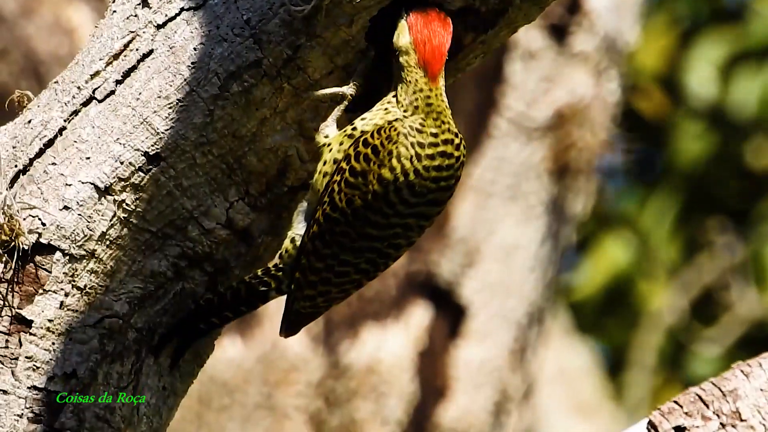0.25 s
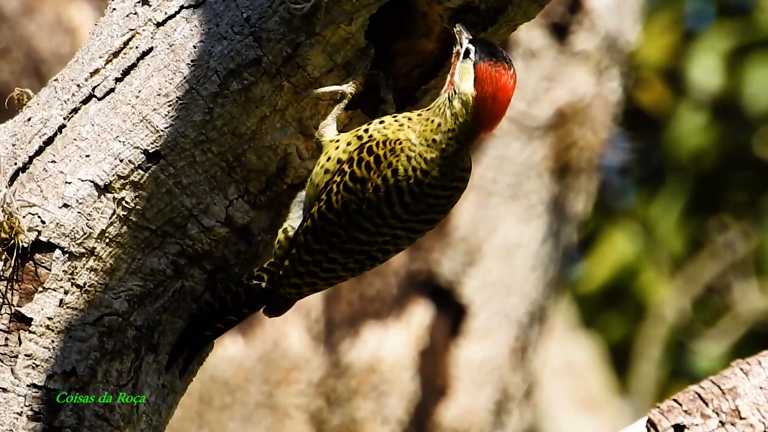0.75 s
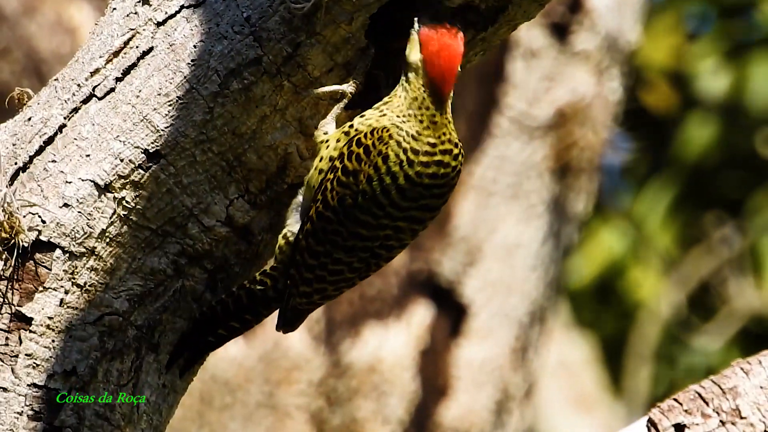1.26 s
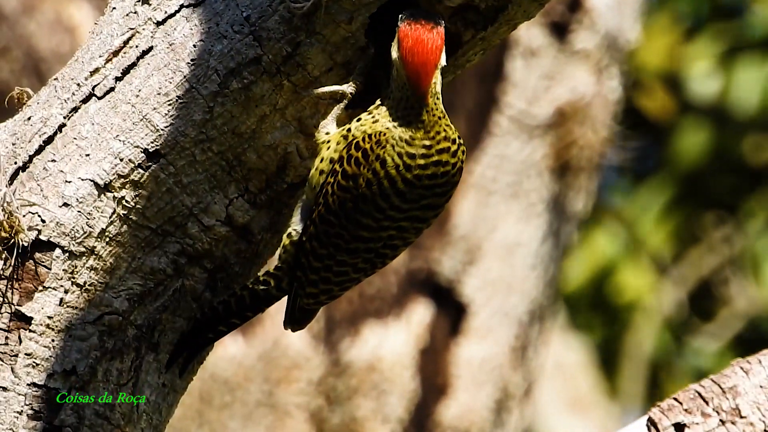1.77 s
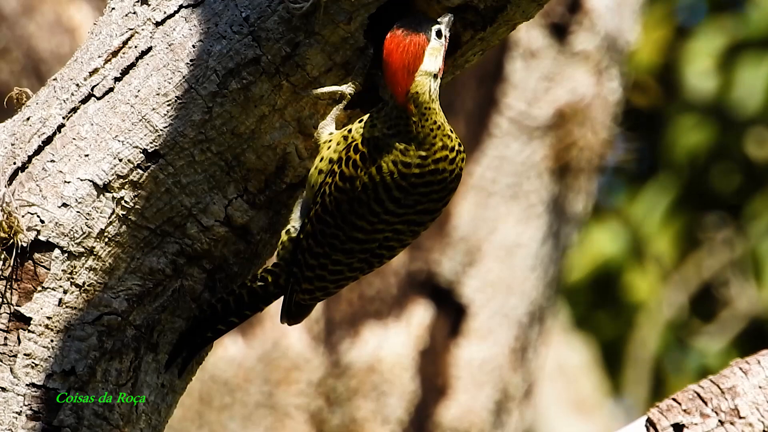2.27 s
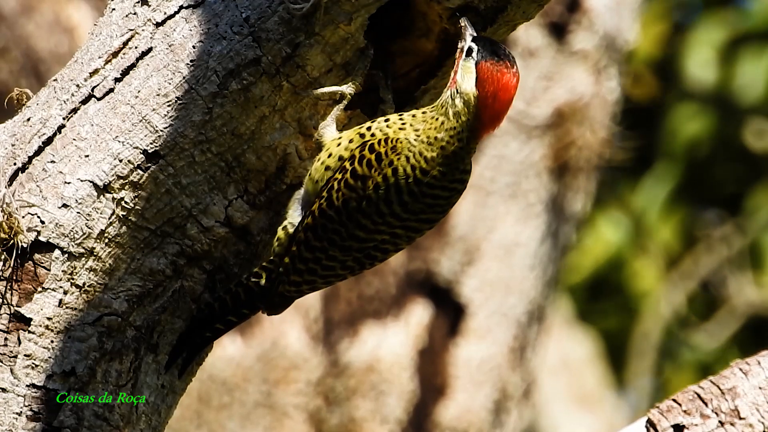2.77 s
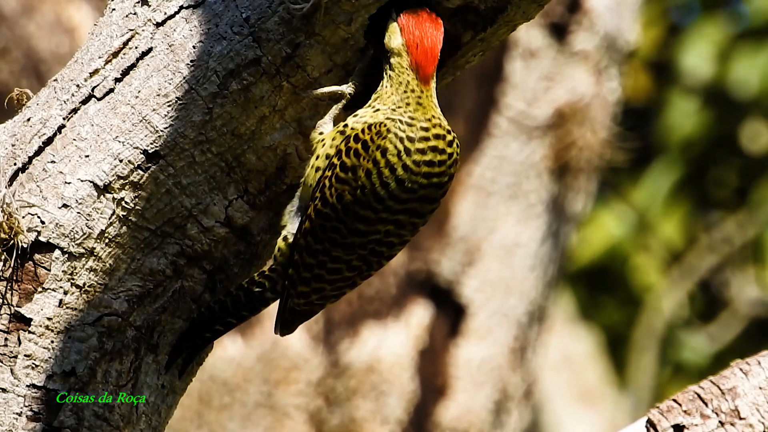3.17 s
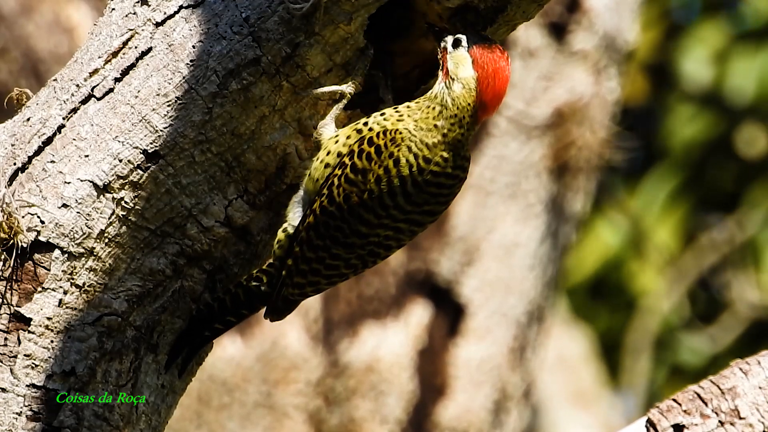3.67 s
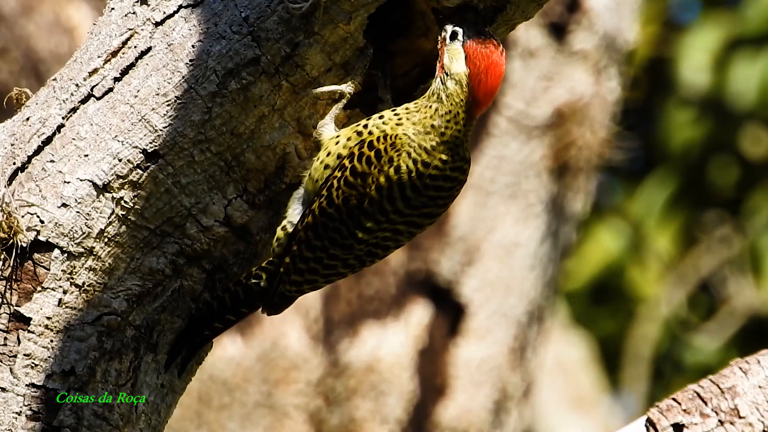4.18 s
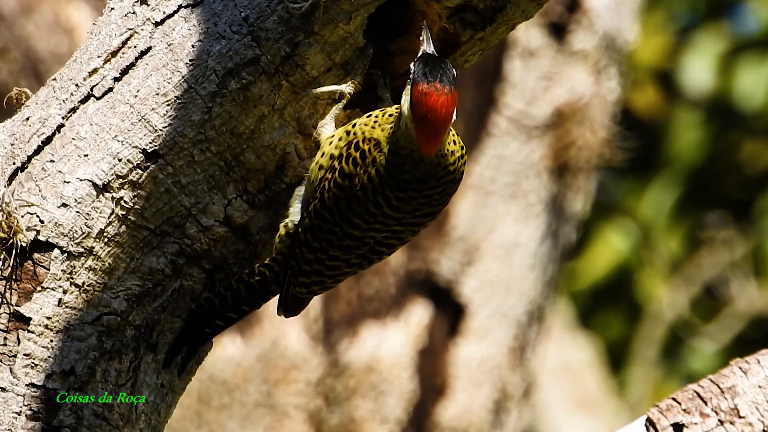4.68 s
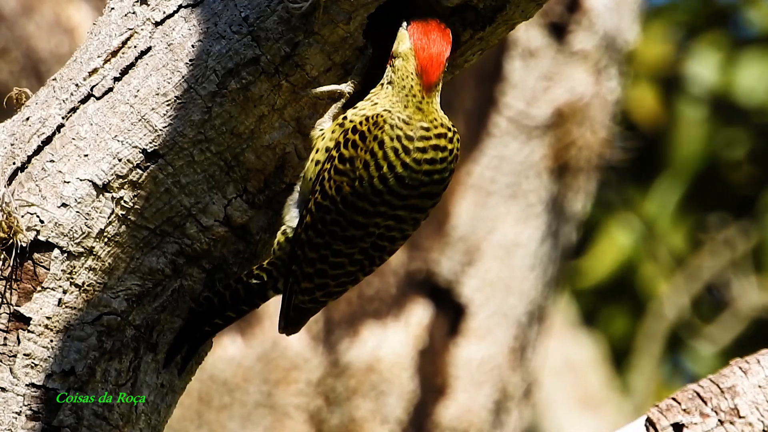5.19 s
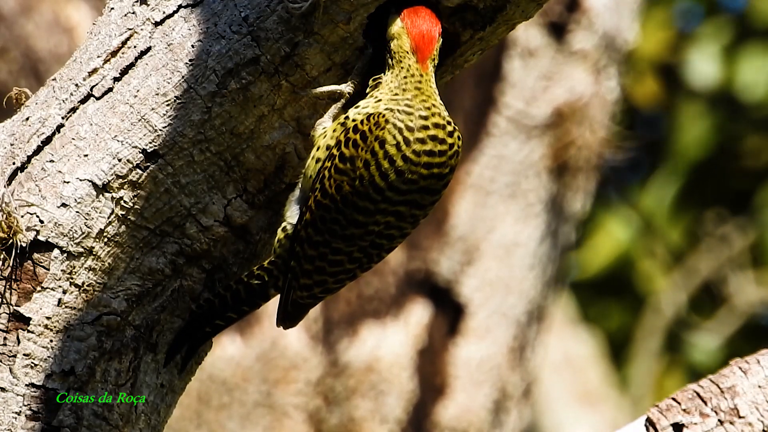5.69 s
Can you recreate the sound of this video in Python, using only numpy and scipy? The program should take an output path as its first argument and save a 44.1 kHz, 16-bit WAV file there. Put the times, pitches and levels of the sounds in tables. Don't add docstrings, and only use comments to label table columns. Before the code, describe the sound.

A woodpecker gives seven short, clear arched calls with woodland echo over soft insect hiss, while a more distant bird squeaks and finally whistles downward.

```python
import sys
import numpy as np
from scipy import signal
from scipy.fft import rfft, irfft, next_fast_len
from scipy.io import wavfile
from scipy.ndimage import uniform_filter1d

SR = 44100
rng = np.random.default_rng(int(sys.argv[2]) if len(sys.argv) > 2 else 0)


def linear_from_db(decibels):
    return 10 ** (np.asarray(decibels, float) / 20)


def int16_out(signal):
    q = np.round(np.clip(np.atleast_2d(signal).T, -1, 1) * 32767)
    wavfile.write(sys.argv[1], SR, q.astype(np.int16))


N = 261954
LEAD_S = 0.4
TIME = np.arange(N + int(LEAD_S * SR)) / SR - LEAD_S


def band(x, hz, width):
    return signal.lfilter(*signal.iirpeak(hz, hz / width, fs=SR), x)


def walk(rate, size):
    k = int(SR / rate)
    held = np.repeat(rng.standard_normal(size // k + 1), k)
    return 1.3 * uniform_filter1d(uniform_filter1d(held, k), k)[:size]


def on_log(hz, table):
    table_hz, values = np.transpose(table)
    return np.interp(np.log(hz), np.log(table_hz), values)


def woodpecker():
    # start_s, drop_end_s, held_pitch_hz, drift_hz_per_s, swell_of_overtones_4_and_5_db_per_s
    series = [
        (0.296, 0.516, 1458, 641, 59),
        (0.8717, 1.072, 1480, -310, 85),
        (1.4447, 1.662, 1456, 261, 18),
        (2.0193, 2.206, 1482, 378, 15),
        (2.6938, 2.8966, 1448, 230, 106),
        (3.3187, 3.5134, 1405, 746, -21),
        (3.9332, 4.1363, 1484, 198.5, 59),
    ]
    # overtone_1_db, overtone_2_db, overtone_4_db, overtone_5_db, overtone_2_below_null_db
    overtone_levels = [(-39, -36.5, -41.5, -35.5, -2), (-34, -37, -40.5, -20, 1.5),
                       (-38, -32.5, -34.5, -28.5, -5.5), (-35.5, -28, -45.5, -37.5, -8),
                       (-35, -36, -41, -26, -0.5), (-36, -37.5, -45, -37, -1.5),
                       (-35, -28.5, -35.5, -34.5, -6)]
    # overtone_3_db, overtone_6_db, overtone_7_db, overtone_8_db, overtone_9_db
    beak_colours = [(-23, -25, -35, -61, -51), (-17, -6, -15, -29, -49), (-9, -12.5, -19, -53, -41),
                    (-15, -14, -16.5, -36, -34), (-18.5, -3.5, -10, -31, -39), (-18, -26, -36, -59, -55),
                    (-10.5, -23, -27, -38, -40)]
    # fundamental_db, overtones_2_3_db, higher_overtones_db
    head_aim = [(-0.5, 1, -3), (-5, 4, -4.5), (-2, -0.5, -3.5), (-4.5, 1.5, 9), (-3.5, 3.5, -4),
                (-5.5, 6.5, 4.5), (1, -1.5, 5)]
    voices = list(zip(series, overtone_levels, beak_colours))
    calls = [call(*voice, hoarse=(k == 0)) for k, voice in enumerate(voices)]
    earlier = linear_from_db(3.5) * call(*voices[2], hoarse=False, shift_s=-1.719)
    away = np.zeros(len(TIME))
    for edges_hz, aim_db in zip(((900, 1900), (1900, 5000), (5000, 8000)), np.transpose(head_aim)):
        sos = signal.butter(4, edges_hz, "band", fs=SR, output="sos")
        away += signal.sosfilt(sos, linear_from_db(aim_db) @ calls + earlier)
    return sum(calls), away


def call(row, levels, beak, hoarse, shift_s=0.0):
    # time_s, half_tones_db, rasp_db, pitch_jitter_rad
    hoarseness = [
        (.29, -70, -52, .7),
        (.325, -52, -38, .45),
        (.398, -42, -37, .25),
        (.412, -39, -48, .07),
        (.455, -41.5, -49, .075),
        (.467, -67, -64, .021),
        (.521, -71, -66, .021),
    ]
    # multiple_of_pitch, level_db
    half_tones = [(1.5, 4), (2.5, -2.5), (3.5, -3.5), (4.5, 10), (5.5, -32)]
    # centre_hz, width_hz, level_db
    rasp_bands = [(1720, 480, -2.5), (2320, 240, 7), (2750, 810, 1.5), (4400, 270, 0), (5200, 310, -2),
                  (5900, 350, -1), (6600, 350, -5), (7400, 440, 2)]
    start, end = row[:2]
    span = slice(*np.searchsorted(TIME, [start + shift_s, end + 0.008 + shift_s]))
    t = TIME[span] - shift_s
    size = len(t)
    hz, db1, db2, db4, db5 = arch(row, levels, t)
    times, *curves = np.transpose(hoarseness)
    half_db, rasp_db, jitter = (np.interp(t, times, curve) for curve in curves)
    rough = hoarse * jitter
    fall = uniform_filter1d(np.clip(-np.gradient(hz) * SR / 25000, 0, 1), 100)
    phase = 2 * np.pi * np.cumsum(hz) / SR + (rough + 0.012 + 0.22 * fall) * walk(900, size)

    effort_db = 10 * np.log10(linear_from_db(2 * db1) + linear_from_db(2 * db2) + linear_from_db(2 * db5))
    effort_db = effort_db - effort_db.max()
    top_db = db1.max() + 0.49 * effort_db
    tones = [(1, db1), (2, db2), (3, top_db + beak[0] + 12 * fall), (4, db4), (5, db5)]
    tones += [(6 + k, top_db + db + 0.13 * k * effort_db) for k, db in enumerate(beak[1:])]
    if hoarse:
        tones += [(k, half_db + db) for k, db in half_tones]

    sound = np.zeros(size)
    for k, db in tones:
        tremble_db = (0.5 + 4 * rough) * walk(120, size) - 6.9 * rough
        sound += linear_from_db(db + tremble_db) * np.sqrt(2) * np.sin(k * phase + k * k)
    if hoarse:
        noise = rng.standard_normal(size) * linear_from_db(4 * walk(400, size))
        rasp = np.zeros(size)
        for centre_hz, width_hz, db in rasp_bands:
            throat = band(band(noise, centre_hz, width_hz), centre_hz, width_hz)
            rasp += linear_from_db(db + 3.5 * walk(62, size)) * throat
        sound += linear_from_db(rasp_db) * rasp / rasp.std()
    out = np.zeros(len(TIME))
    out[span] = sound * signal.windows.tukey(size, 0.06)
    return out


def arch(row, levels, t):
    # after_start_s, below_held_pitch_hz
    climb = [(0, 591), (.012, 352.5), (.022, 222), (.05, 81.5), (.08, 3.5), (.12, -5.5)]
    # after_end_s, below_held_pitch_hz
    fall_off = [(-.045, -1), (-.024, 16), (-.015, 76.5), (-.008, 233.5), (0, 500), (.006, 541.5)]
    # pitch_hz, then gain of overtones 1, 2, 4, 5 in dB
    slack = [(890, -40, -14, -28, -39), (1062, -21.5, -4.5, -22, -31.5), (1260, -20.5, -11, -16, -15),
             (1389, -5.5, -4, -7, -3), (1498.4, 1.5, -0.5, -2.5, -1.5)]
    # time_s, overtone, gain_db, half_width_s
    crossings = [(.432, 2, -18, .02), (.428, 4, -16, .022), (.49, 2, -10, .006), (.942, 2, -20, .008),
                 (1.02, 2, -18, .02), (.935, 5, -5, .008), (1.049, 5, -7, .009), (1.061, 5, 1.5, .0025),
                 (1.525, 2, -14, .008), (1.64, 2, -8, .01), (1.649, 5, 6, .003), (2.105, 4, -14, .012),
                 (2.108, 5, -14, .01), (2.075, 5, 6, .012), (2.784, 2, -26, .017), (2.874, 2, -12, .006),
                 (2.752, 4, -14, .01), (2.752, 5, -9, .006), (3.362, 2, -14, .006), (3.484, 2, -20, .011),
                 (4.0, 2, -18, .011), (4.124, 5, 6, .005), (3.985, 5, -8, .01)]
    start, end, held_hz, drift, swell = row
    late = t - start - 0.1
    hz = held_hz + drift * late
    hz = hz - np.interp(t - start, *np.transpose(climb)) - np.interp(t - end, *np.transpose(fall_off))
    hz = uniform_filter1d(hz, size=130)
    slack_hz, *slack_db = np.transpose(slack)
    loss = [np.interp(hz, slack_hz, curve) for curve in slack_db]

    def cross(order):
        return sum(db * np.exp(-((t - s) / width) ** 2) for s, k, db, width in crossings if round(k) == order)

    null_hz, null_width_hz = 1455, 13
    second = cross(2) + levels[4] / (1 + np.exp((hz - null_hz) / null_width_hz))
    snap = 5.5 * np.exp(-((t - end + 0.014) / 0.005) ** 2)
    extra = (14 * late, second + snap, swell * late + cross(4), swell * late + cross(5))
    return hz, *(db + a + b for db, a, b in zip(levels, loss, extra))


def second_bird():
    # start_s, length_s, first_hz, last_hz,
    # level_db
    squeaks = [(0.64, .032, 4900, 5020, -46.5), (0.693, .014, 4880, 5240, -35.5),
               (0.702, 0.014, 5200, 6100, -41), (.708, 0.018, 4950, 4760, -40.5),
               (0.774, 0.0092, 4700, 4730, -50), (0.821, 0.062, 4830, 4700, -50.5),
               (3.061, 0.016, 4370, 5400, -41), (3.079, .01, 4900, 5200, -36),
               (3.086, 0.024, 5610, 5670, -43), (3.097, 0.025, 6250, 6340, -40.5),
               (3.115, .016, 4600, 5400, -38), (3.128, .055, 6220, 6320, -51),
               (3.14, .013, 4400, 4500, -44.5), (3.17, .09, 4580, 4470, -54),
               (5.487, 0.025, 4020, 5670, -43), (5.492, 0.019, 3240, 3650, -50),
               (5.507, 0.017, 4803, 4830, -28), (5.516, 0.024, 6770, 7540, -41.5),
               (5.52, 0.011, 4930, 4650, -29.5), (5.529, 0.0086, 4900, 6000, -28.5),
               (5.535, .01, 5930, 5600, -40), (5.546, 0.0065, 4700, 5100, -28.5),
               (5.563, .008, 5900, 5200, -51), (5.572, 0.006, 4590, 4680, -29.5),
               (.648, .06, 2450, 2560, -59),
        (3.069, .04, 2540, 2960, -54),
        (3.16, .012, 3100, 3170, -52),
        (5.68, .016, 2580, 2560, -53),
        (5.682, .018, 1780, 1950, -52),
    ]
    steady_db, flutter_range_db = -31, 22
    out = np.zeros(len(TIME))
    flutter = walk(180, len(TIME))
    for s, length, hz0, hz1, db in squeaks:
        depth = np.clip((steady_db - db) / flutter_range_db, 0, 1)
        i, size = int((s + LEAD_S) * SR), int(length * SR)
        shape = signal.windows.tukey(size, min(0.013 / length, 1.0))
        phase = 2 * np.pi * np.cumsum(np.linspace(hz0, hz1, size)) / SR
        phase = phase + 1.1 * depth * flutter[i - 500:][:size]
        level = linear_from_db(db + 6.8 * depth * flutter[i:i + size])
        out[i:i + size] += level * np.sqrt(2) * shape * np.sin(phase)
    return out


def whistle():
    # time_s, pitch_hz, effort_db
    path = [
        (5.546, 1570, -46),
        (5.566, 1560, -42),
        (5.6, 1558, -42),
        (5.755, 1528, -42),
        (5.8, 1490, -43),
        (5.845, 1425, -49),
        (5.89, 1372, -46),
        (5.93, 1325, -58),
    ]
    # overtone, level_db, strongest_at_s, fading_over_s
    overtones = [(1, -10, 5.575, 0.011), (2, -2, 5.555, 0.011), (2, -7.5, 5.725, 0.12), (3, 2, 5.75, 0.46),
                 (4, 12, 5.556, 0.0084), (4, -11, 5.62, .05)]
    # time_s, half_width_s
    breaks = [
        (5.774, .025),
        (5.85, .009),
        (5.879, .0065),
        (5.903, .0055),
    ]
    s, hz, db = np.transpose(path)
    flutter = 0.21 * walk(180, len(TIME))
    phase = 2 * np.pi * np.cumsum(np.interp(TIME, s, hz)) / SR + 0.5 * flutter
    effort_db = np.interp(TIME, s, db, left=-120, right=-120) + 5.7 * flutter
    effort = uniform_filter1d(linear_from_db(effort_db), size=100)
    gate = np.clip((TIME - 5.582) / 0.004, 0, 1)
    for at, width in breaks:
        gate = gate * (1 - 0.9 * np.exp(-((TIME - at) / width) ** 4))
    sound = np.zeros(len(TIME))
    for k, level_db, at, width in overtones:
        turn = linear_from_db(level_db) * np.exp(-((TIME - at) / width) ** 2)
        sound += turn * (gate if k == 3 else 1) * np.sin(k * phase)
    return effort * np.sqrt(2) * sound


def chatter():
    # start_s, hold_s, centre_hz, level_db, upper_band_level_db
    bursts = [
        (0.65, 0.039, 4900, -43.5, -52),
        (.69, 0.11, 4880, -41, -45),
        (3.074, .012, 5150, -43, -56),
        (3.102, 0.14, 4850, -49, -47.5),
        (5.466, 0.082, 3620, -48.5, -46),
        (5.566, 0.076, 4580, -43.5, -43),
    ]
    rise_s, fade_db_s = 0.013, 248
    out = np.zeros(len(TIME))
    t = np.arange(SR // 3) / SR
    for s, hold, hz, low_db, high_db in bursts:
        shape = np.clip(t / rise_s, 0, 1) * linear_from_db(-fade_db_s * np.clip(t - hold, 0, 1))
        for centre_hz, db, width in ((hz, low_db, 650), (6200, high_db, 900)):
            grains = rng.standard_normal(len(t)) * linear_from_db(2.0 * walk(150, len(t)))
            grains = band(band(grains, centre_hz, width), centre_hz, width)
            out[int((s + LEAD_S) * SR):][:len(t)] += linear_from_db(db - 2) * shape * grains / grains.std()
    return out


def ports(x, lag, pan_db):
    turn = np.exp(-1j * np.pi * np.fft.rfftfreq(len(x)) * lag)
    left = linear_from_db(pan_db / 2) * irfft(rfft(x) * turn, len(x))
    right = linear_from_db(-pan_db / 2) * irfft(rfft(x) / turn, len(x))
    return np.array([left, right])


def woods(x, near_db, far_db, wall_db, t60_near=0.29, t60_far=0.81, wall_s=0.0626):
    t = np.arange(int(0.9 * SR)) / SR
    tail = linear_from_db(near_db - 60 * t / t60_near) + linear_from_db(far_db - 60 * t / t60_far)
    tail = tail * np.clip(t / 0.014, 0, 1)
    shape = tail + linear_from_db(wall_db) * np.exp(-((t - wall_s) / 0.0062) ** 2)
    common, apart = rng.standard_normal(len(t)), rng.standard_normal((2, len(t)))
    bright = signal.lfilter(*signal.butter(1, 2000, "high", fs=SR), x)
    return signal.fftconvolve(bright[None], shape * (1.06 * common + 0.73 * apart), axes=1)[:, :len(x)]


def leaves():
    # frequency_hz, density_db_per_hz
    hiss = [(100, -56), (200, -48), (600, -24), (1000, -9), (2100, -3), (3400, -2.5), (3950, -4.5),
            (4600, -1), (6600, 3), (7600, -4.5), (8600, -14), (10500, -22), (13000, -25), (15600, -28)]
    # frequency_hz, likeness_0_to_1
    likeness = [(60, 0.06), (130, 0.6), (290, 0.86), (640, 0.96), (1410, 1), (3100, 0.7), (6820, 0),
                (15000, 0)]
    # frequency_hz, left_minus_right_db
    tilt = [(60, 6), (110, 0), (200, 0), (380, -4), (700, 1), (1290, -1.5), (2380, -1.5), (4400, -1),
            (8120, -1.5), (15000, 1)]
    # time_s, level_db
    breeze = [
        (0, -2),
        (2.5, 1),
        (3.5, -2),
        (4.5, -4),
        (5.94, -3),
    ]
    size = next_fast_len(N)
    hz = np.maximum(np.fft.rfftfreq(size, 1 / SR), 1)
    alike = np.clip(on_log(hz, likeness), 0, 1) * np.clip(hz / 420, 0, 1)
    common = rfft(ports(rng.standard_normal(size), lag=1.0, pan_db=0.0))
    apart = rfft(rng.standard_normal((2, size)))
    both = np.sqrt(alike) * common + np.sqrt(1 - alike) * apart
    both *= linear_from_db(on_log(hz, hiss) + np.array([[0.5], [-0.5]]) * on_log(hz, tilt))
    swell = walk(1.0, N)
    breeze_db = np.interp(np.arange(N) / SR, *np.transpose(breeze))
    out = np.zeros((2, N))
    for octave in np.arange(6, 14.4, 0.5):
        share = np.cos(np.clip(np.log2(hz) - octave, -0.5, 0.5) * np.pi) ** 2
        flicker_db = (1.0 + 0.89 * np.clip(10 - octave, 0, 1)) * walk(9, N)
        db = swell / 2 + flicker_db + breeze_db * np.clip((11.6 - octave) / 1.19, 0, 1)
        out += linear_from_db(db) * irfft(both * share, size)[:, :N]
    return out * linear_from_db(-46.5) / out.mean(0)[-N // 4:].std()


def thumps():
    # time_s, peak_db
    puffs = [(0.203, -81), (0.836, -76), (1.503, -74), (1.609, -77), (1.868, -87), (2.004, -79),
             (2.328, -82), (2.672, -86), (3.53, -92)]
    out = np.zeros((2, N))
    for (s, db), noise in zip(puffs, rng.standard_normal((len(puffs), 3, 700))):
        puff = np.hanning(700) * (noise[0] + 1.5 * noise[1:])
        out[:, int(s * SR):][:, :700] += linear_from_db(db + 12) * puff
    for _ in range(3):
        out = band(out, 290, 300)
    return out


def scene():
    near, away = woodpecker()
    far = second_bird() + whistle() + chatter()
    birds = ports(near, lag=0.45, pan_db=-0.6) + woods(away, near_db=-44, far_db=-52.5, wall_db=-56.5)
    birds += ports(far, lag=-2.0, pan_db=-0.5) + woods(far, near_db=-43.0, far_db=-54, wall_db=-49.0)
    birds = signal.sosfilt(signal.butter(4, 600, "high", fs=SR, output="sos"), birds)
    return birds[:, -N:] + leaves() + thumps()


def thin_treble(x, mask_db=-42.5, hold=0.55, slope_db=-1.1, patchy_db=2.2):
    hz, t, z = signal.stft(x, SR, nperseg=1024)
    hz = hz[:, None]
    power = np.abs(z.mean(0)) ** 2
    total = power.sum(0)
    loud = signal.lfilter([1 - hold], [1, -hold], total)
    local = uniform_filter1d(uniform_filter1d(power, size=9, axis=0), size=3, axis=1)
    patches = rng.standard_normal((len(hz) // 8 + 1, len(t) // 2 + 1))
    patches = np.repeat(np.repeat(patches, 8, axis=0), 2, axis=1)[:len(hz), :len(t)]
    limit_db = mask_db + slope_db * (hz - 11000) / 1000 + patchy_db * patches
    limit = linear_from_db(2 * limit_db) * loud ** 0.45 * total.min() ** 0.55
    kept = ((local > limit) | (hz < 8700)) * (hz < 15740)
    return signal.istft(z * kept, SR, nperseg=1024)[1][:, :N]


def roll_off(x):
    return signal.sosfilt(signal.butter(12, 15740, fs=SR, output="sos"), x)


def record(dry):
    return roll_off(thin_treble(dry))


dry = scene()
out = record(dry)
int16_out(out)
```